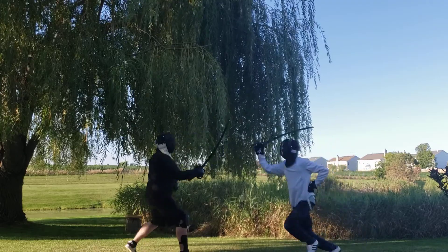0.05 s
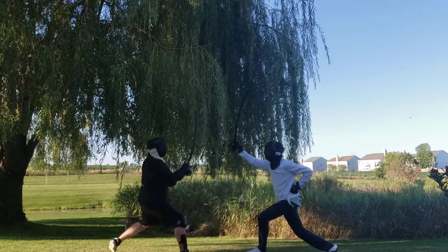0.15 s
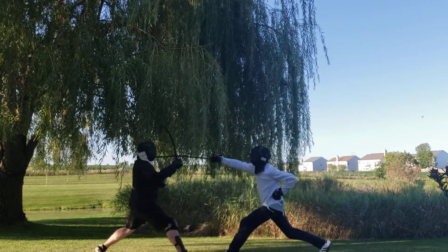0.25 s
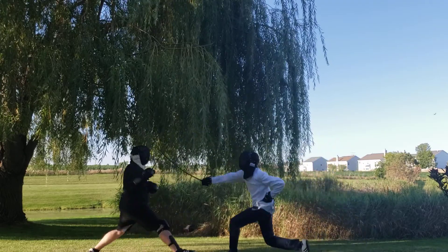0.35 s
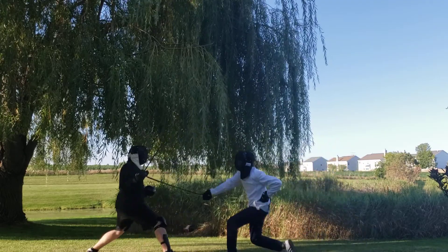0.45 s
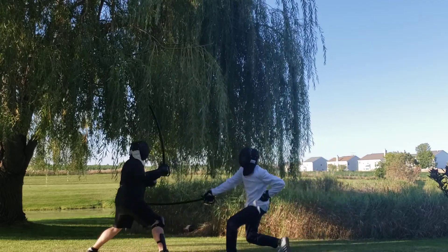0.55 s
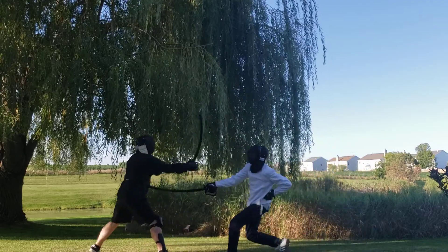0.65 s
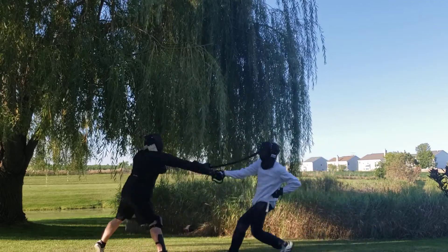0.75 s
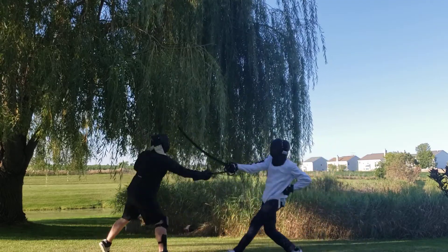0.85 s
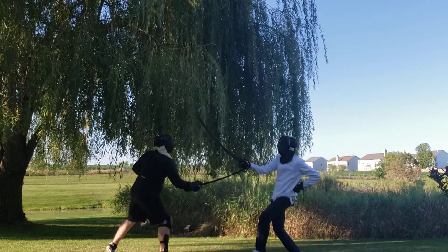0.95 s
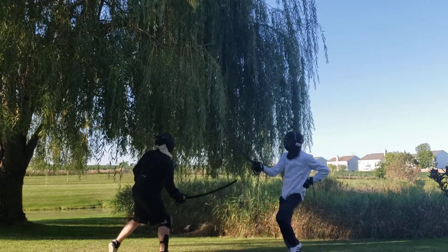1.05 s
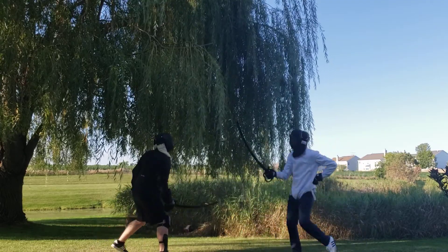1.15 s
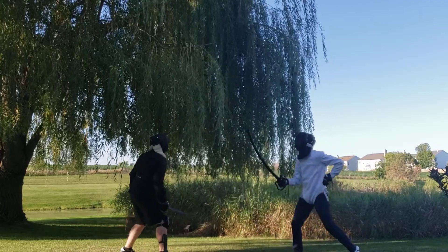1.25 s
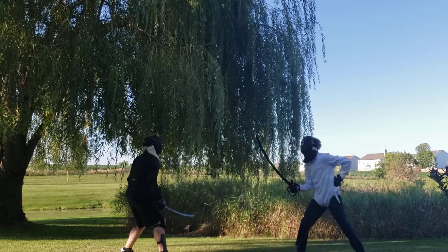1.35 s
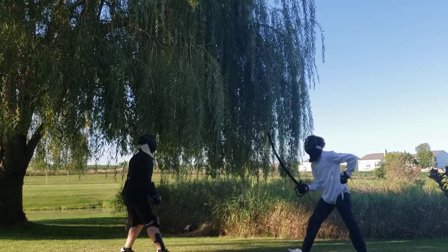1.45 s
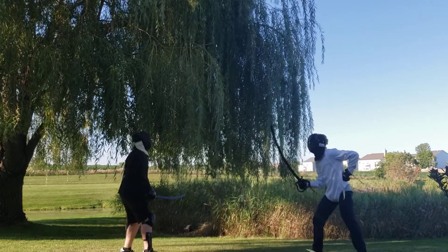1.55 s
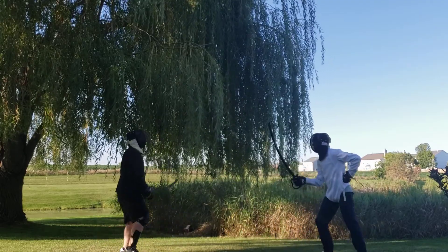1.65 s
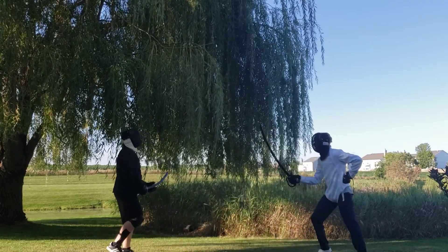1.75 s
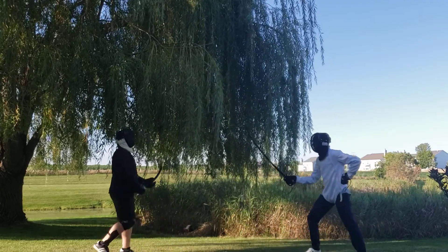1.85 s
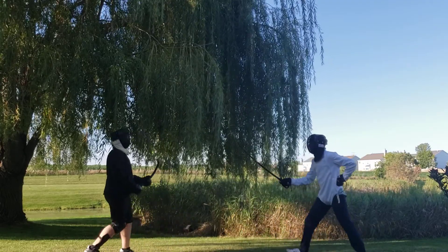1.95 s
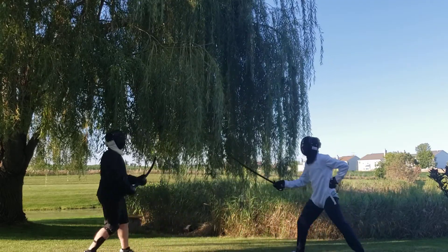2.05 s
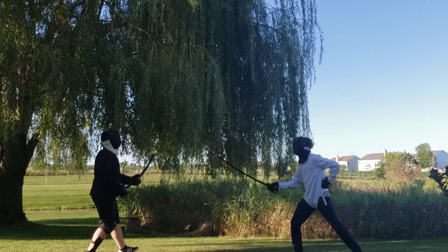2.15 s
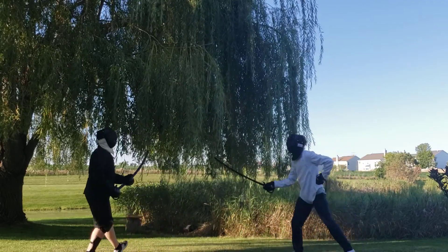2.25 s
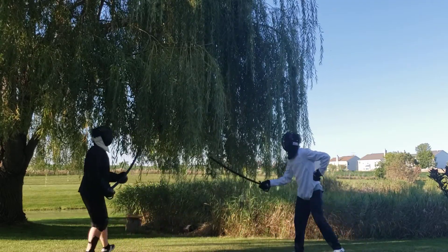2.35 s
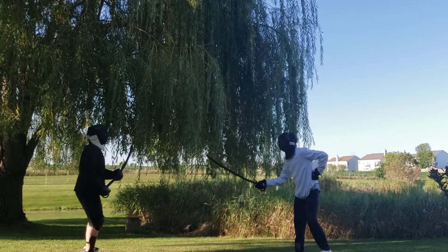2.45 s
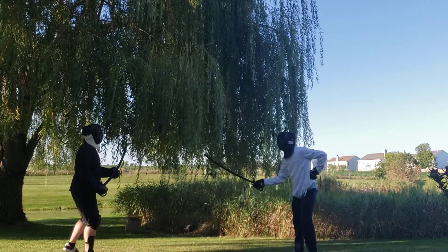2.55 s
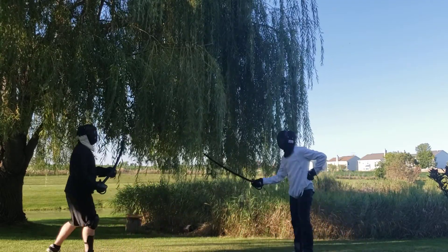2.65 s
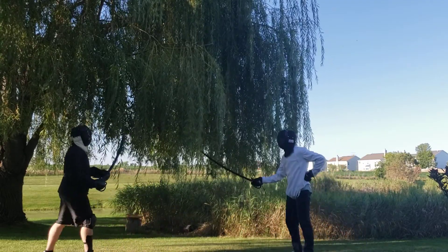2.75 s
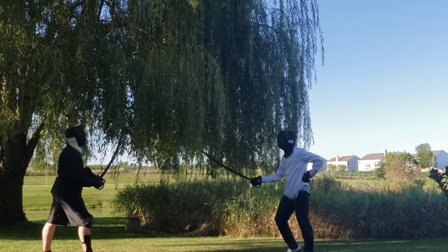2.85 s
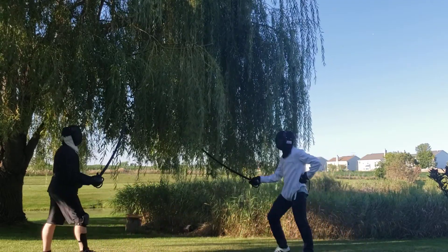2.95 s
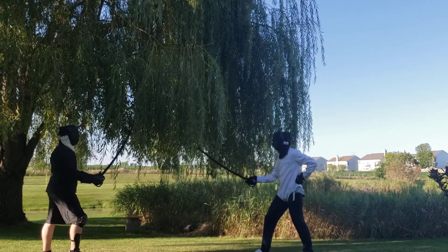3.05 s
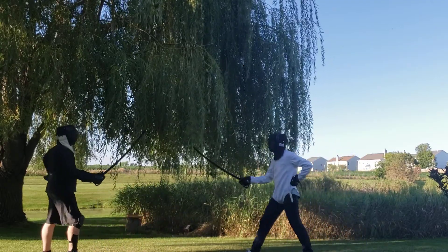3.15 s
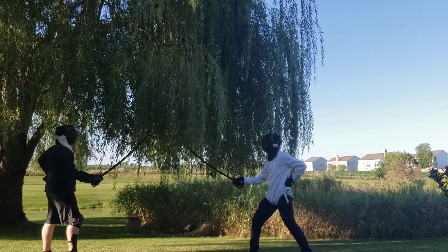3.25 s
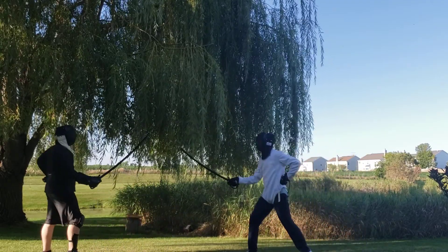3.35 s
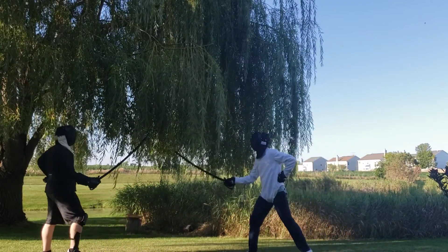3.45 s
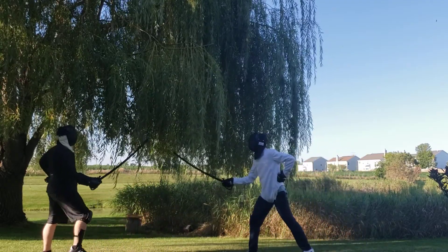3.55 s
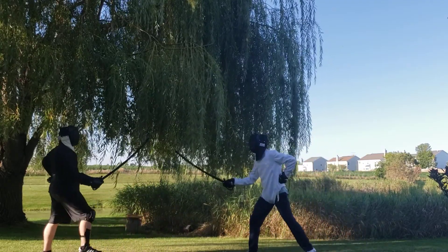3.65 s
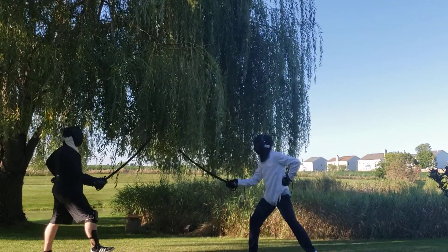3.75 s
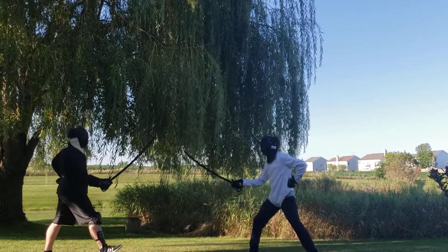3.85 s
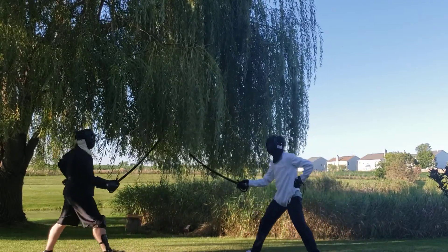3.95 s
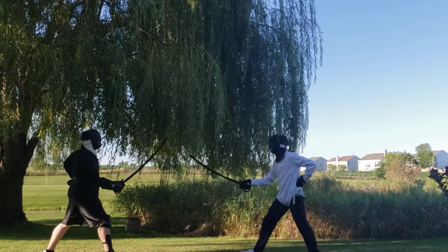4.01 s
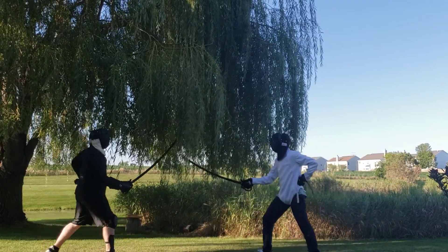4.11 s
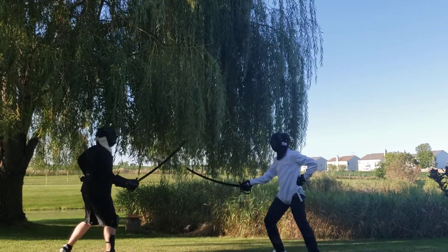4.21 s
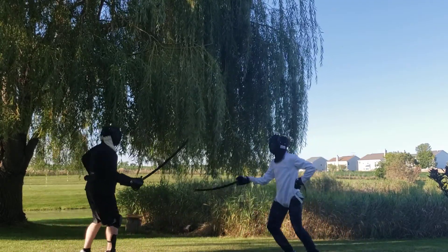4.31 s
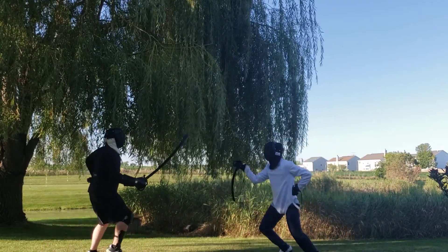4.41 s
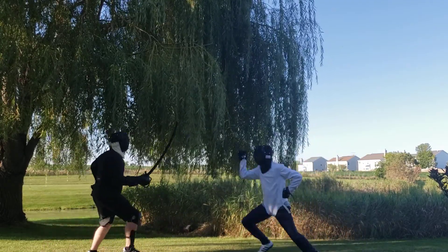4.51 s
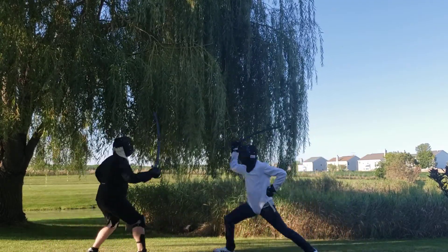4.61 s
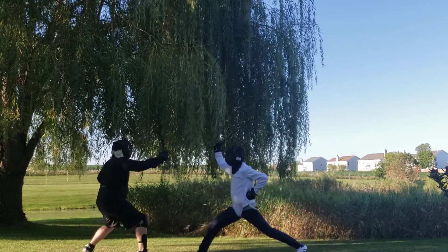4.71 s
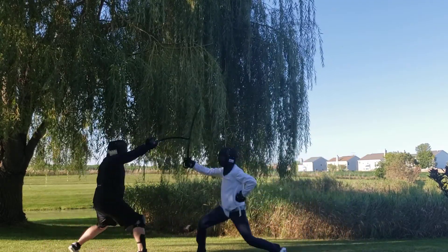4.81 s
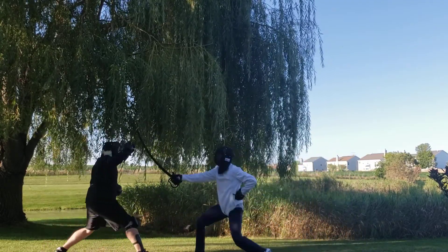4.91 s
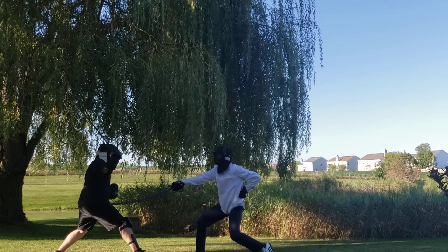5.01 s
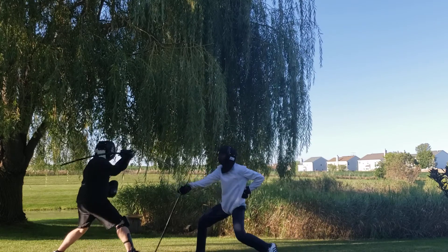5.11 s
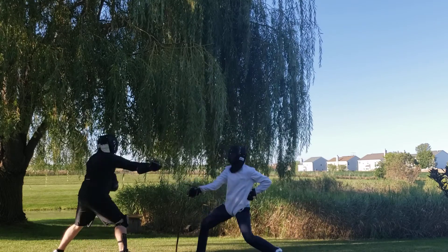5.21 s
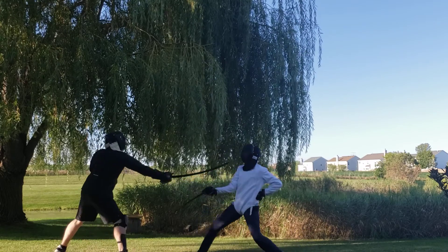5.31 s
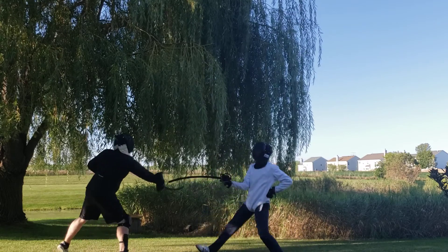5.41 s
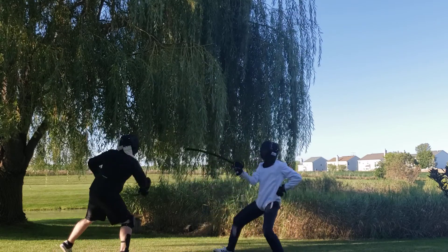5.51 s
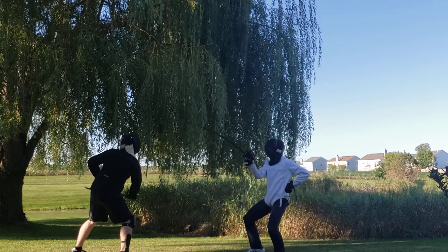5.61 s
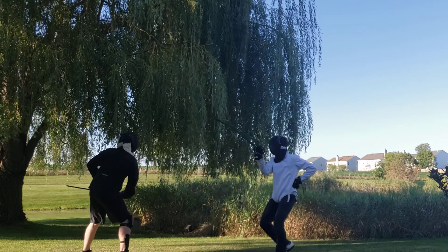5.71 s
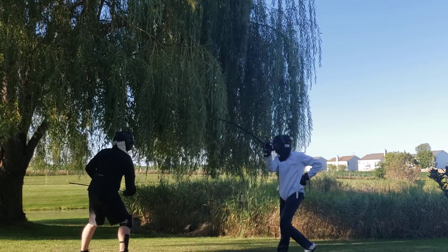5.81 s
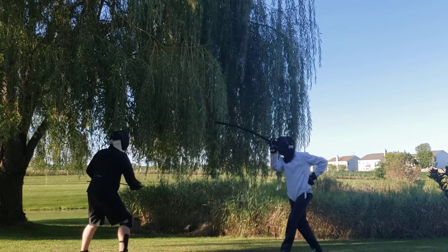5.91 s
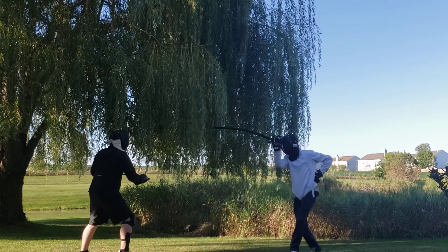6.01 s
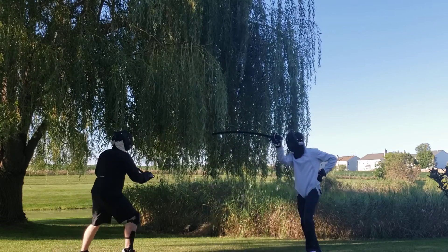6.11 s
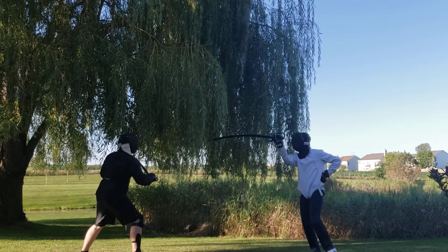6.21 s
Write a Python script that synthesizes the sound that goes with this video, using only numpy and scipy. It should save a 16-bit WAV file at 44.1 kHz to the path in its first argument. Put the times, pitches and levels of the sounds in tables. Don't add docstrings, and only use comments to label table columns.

```python
import sys
import numpy as np
from scipy import signal
from scipy.fft import rfft, irfft
from scipy.io import wavfile
from scipy.ndimage import uniform_filter1d

SR = 44100
rng = np.random.default_rng(int(sys.argv[2]) if len(sys.argv) > 2 else 0)


def master(y):
    cut = np.clip(np.atleast_2d(y).T, -1, 1)
    pcm = np.round(cut * 32767)
    wavfile.write(sys.argv[1], SR, pcm.astype(np.int16))


def elevation(decibels):
    levels = np.asarray(decibels, float)
    return 10 ** (levels / 20)


N = 276371
TIME = np.arange(N) / SR


def level(x, db):
    return x * elevation(db) / np.sqrt(np.mean(x ** 2))


def curve(table):
    return np.interp(TIME, *np.transpose(table))


def tilt(left_db):
    return elevation(np.array([[left_db], [-left_db]]))


def colour(points, channels=1):
    hz, db = np.transpose(points)
    axis_hz = np.log(np.fft.rfftfreq(N, 1 / SR) + 1)
    gain = elevation(np.interp(axis_hz, np.log(hz), db, left=-120, right=-120))
    return level(irfft(rfft(rng.standard_normal((channels, N))) * gain, N), 0)


def hump(hz, width_hz):
    return [(max(hz - 2 * width_hz, hz / 4), -25), (hz - width_hz / 2, -4), (hz, 0),
            (hz + width_hz / 2, -4), (hz + 2 * width_hz, -25)]


def walk(rate_hz):
    k = int(SR / rate_hz)
    held = np.repeat(rng.standard_normal(N // k + 1), k)
    return 1.3 * uniform_filter1d(uniform_filter1d(held, k), k)[:N]


def add(out, s, sound, pan_db, lag_s):
    for side, start_s in enumerate((s, s + lag_s)):
        i = int(start_s * SR)
        out[side, i:i + len(sound)] += sound[:N - i] * elevation(pan_db / 2 * (1 - 2 * side))


def swells(peak_s, peak_db, rise_db_per_s, fall_db_per_s):
    late_s = TIME - np.asarray(peak_s)[:, None]
    rise, fall = np.reshape(rise_db_per_s, (-1, 1)), np.reshape(fall_db_per_s, (-1, 1))
    slope = np.where(late_s < 0, rise, -fall)
    return elevation(np.maximum(np.asarray(peak_db)[:, None] + slope * late_s, -150)) ** 2


def rings(t, modes_hz, t60_s, chance, spread_db, shape_db):
    count = len(modes_hz)
    hz = np.array(modes_hz)[:, None] * (1 + 0.01209 * chance[:count, None])
    mode_gain = elevation(shape_db + spread_db * chance[::-1][:count])
    ring = mode_gain @ np.sin(2 * np.pi * hz * t)
    ring = ring * elevation(-60 * t / t60_s) * np.minimum(t / .0005, 1) ** 2
    return ring / np.abs(ring).max()


BLADE_HZ = [2330, 3000, 3780, 4170, 4900, 5970, 6170, 7780]
FORTE_HZ = [2000, 2623, 3200, 3520, 4500, 5250]
GUARD_HZ = [575, 842, 1164, 1461, 1790]
GUARD_DB = np.array([-5.5, 1, -0.5, -1, -7.5])


def clacks(table, lag_s, blade_t60_s, guard_t60_s, ring_db, narrow_db):
    out, t = np.zeros((2, N)), np.arange(SR // 10) / SR
    chance = rng.standard_normal((len(table), 16))
    high = signal.butter(4, 10000, "high", fs=SR, output="sos")
    for (s, db, hz, guard_db, crack_db, pan_db), luck in zip(table, chance):
        late_s = t - max(.0006, 1.4 / hz)
        modes_hz = np.array([hz, *BLADE_HZ, *FORTE_HZ])
        shape_db = -narrow_db * np.log2(modes_hz / hz) ** 2
        blade = rings(t, modes_hz, blade_t60_s, luck, 3.3, shape_db)
        burst = -np.cos(2 * np.pi * hz * late_s) * np.exp(-(late_s / max(.0003, .7 / hz)) ** 2)
        guard = rings(t, GUARD_HZ, guard_t60_s, luck[::-1], 1.5, GUARD_DB) * elevation(guard_db)
        splinters = rng.standard_normal(len(t)) * elevation(-60 * np.abs(late_s) / 0.0016)
        crack = signal.sosfilt(high, splinters) * elevation(crack_db + 5)
        blow = elevation(ring_db) * blade + elevation(2) * burst + guard + crack
        add(out, s - max(.0004, 1.4 / hz - .0002), elevation(db) * blow, pan_db, lag_s)
    return out


# (time [s], peak [dB], ring [Hz], guard knock [dB], crack [dB])
CLACKS = [(0.314, -13, 7630, -7, -5.5), (0.3142, -15, 4850, -20.5, -19), (0.3157, -18, 2410, -12.5, -14.5),
          (0.322, -22, 6200, -51.5, -15), (0.4588, -15, 2610, -25.5, -14), (.4588, -26, 1400, -13.5, -20),
          (.3452, -24.5, 4600, -30, -25), (.349, -24, 4300, -31.5, -25.5), (0.352, -27, 4980, -14, -26),
          (0.374, -31, 5000, -28, -24.5), (0.7723, -25.5, 2440, -1, -8), (0.773, -20, 3200, -4, -12),
          (0.7747, -20.5, 1497, -5, -19), (.776, -33.5, 907, -10.5, -21), (.7865, -26, 792, 7.5, -18),
          (.7935, -31.5, 9500, -20.5, -0.5), (0.798, -32, 4500, -14.5, -19.5),
          (.8105, -34.5, 2500, -4, -22), (0.7858, -26, 2950, -6.5, -9.5), (0.791, -35, 2350, -7, 1),
          (0.8025, -22.5, 1246, -12, -27.5), (.8024, -27, 3000, -20.5, -24.5),
          (4.7098, -46.5, 1037, -12, -12), (4.8864, -7, 5870, -28.5, -25), (4.8868, -19.5, 1305, -18, -16),
          (4.8866, -13, 3960, -29.5, -24.5), (4.892, -26.5, 5730, -24, -19.5),
          (4.8977, -19, 1412, -16, -7.5), (4.908, -28.5, 4000, -32, -24), (4.9147, -19, 4170, -39, -25),
          (4.9243, -25, 4100, -18, -18), (4.98, -34, 7780, -31, -24.5), (4.9454, -20.5, 4350, -37.5, -20.5),
          (4.952, -19.5, 4050, -8, -34), (5.455, -18.5, 3690, -11.5, -6), (5.4552, -21, 1377, -7, -16.5),
          (5.4554, -20, 14480, -31, -20.5), (5.4554, -31.5, 7600, -23, -15), (5.46, -32, 2330, -19, -14),
          (5.4755, -38, 990, -9, -22)]
# (time [s], peak [dB], ring [Hz], guard knock
# [dB], crack [dB])
MORE_CLACKS = [(0.3159, -15.5, 1463, -17.5, -30.5), (0.316, -18, 4900, -29, -25), (0.3654, -31, 2100, -25, -20),
               (.4585, -31.5, 6550, -29, -15), (.7725, -34, 4200, -25, -20), (.7728, -28, 6800, -28, -20.5),
               (.7735, -22.5, 2180, -20, -20.5), (0.7902, -26, 3250, -25, -19), (0.795, -32.5, 3800, -26, -21),
               (4.8866, -24.5, 2980, -29.5, -29.5), (4.8915, -25.5, 5600, -30, -25),
               (4.9125, -28, 5500, -31, -25), (4.919, -30, 5500, -30.5, -25.5), (4.927, -31.5, 5600, -30, -25),
               (4.9372, -28, 2480, -18.5, -31), (4.9525, -26.5, 2800, -9, -32), (5.4553, -31, 2140, -15, -20),
               (5.4556, -36, 5190, -25, -17), (5.4585, -38, 3000, -20, -15), (5.484, -47, 3840, -19, -15)]
# (time [s], left minus right [dB])
BLADES_PAN = [(.3, 6.5), (.5, 7), (.77, 4.5), (.81, 2.5), (4.9, 4), (4.92, 11.5), (4.96, 3.5), (5.46, 6)]


def struck_blades():
    struck = [(*row, np.interp(row[0], *np.transpose(BLADES_PAN))) for row in CLACKS + MORE_CLACKS]
    return clacks(struck, lag_s=.00005, blade_t60_s=.02, guard_t60_s=.02, ring_db=-9, narrow_db=6.5)


# (time [s], level [dB], centre [Hz], low part [dB], top part [dB])
SLIDES = [(.12, -70.5, 2700, -72.5, -85.5), (.26, -68.5, 2900, -67, -91.5), (.322, -41.5, 4840, -39.5, -40),
          (0.346, -30.5, 4260, -41, -40.5), (.375, -36.5, 4500, -51, -50.5), (.42, -51.5, 3600, -52.5, -59),
          (0.459, -35, 2740, -40.5, -48), (.52, -44, 3620, -74, -58), (.6, -55, 3250, -57, -68),
          (.779, -34.5, 2660, -39, -42.5), (0.788, -39, 3000, -31.5, -38), (.835, -41, 3200, -46.5, -50),
          (0.926, -47, 2260, -61, -63), (1.0, -60, 2400, -59, -73), (4.71, -71.5, 2640, -66.5, -75),
          (4.76, -67, 2970, -62, -61), (4.888, -41, 5500, -42.5, -33), (4.904, -30.5, 4500, -41, -51),
          (4.931, -42, 4700, -47.5, -50), (4.96, -35, 3600, -45, -48), (5.027, -43.5, 2870, -71, -66),
          (5.17, -60, 3300, -65, -90), (5.427, -57, 2640, -60, -71.5), (5.458, -57, 2900, -49, -48),
          (5.485, -48.5, 3470, -50, -50.5), (5.56, -65, 3000, -62, -64.5), (5.93, -74, 3400, -68, -78)]
BLOWS_S = np.array([0, .3143, .4588, .7729, 4.8865, 5.4552])


def slides():
    s, db, centre_hz, low_db, top_db = np.transpose(SLIDES)
    rise_db_per_s = np.where(db < -59, 176.5, 348.5)
    begun = TIME > np.take(BLOWS_S, np.searchsorted(BLOWS_S, s) - 1)[:, None]
    parts = []
    for part_db, fade, scatter_db, scatter_fade in ((db, 330, -17, 80), (low_db, 600, -27, 70),
                                                    (top_db, 380, -19, 90)):
        direct = swells(s, part_db, rise_db_per_s, fade)
        scatter = swells(s, part_db + scatter_db, rise_db_per_s, scatter_fade)
        parts.append((direct + scatter) * begun + 1e-16)
    hz = centre_hz @ parts[0] / parts[0].sum(axis=0)
    gain, low_gain, top_gain = (np.sqrt(part.sum(axis=0)) for part in parts)
    body = 0
    for band_hz in (2000, 2800, 3800, 4900, 6200, 7600):
        band_db = -11 * np.log2(band_hz / hz) ** 2 + 2 * walk(400)
        body = body + elevation(band_db) * colour(hump(band_hz, .3 * band_hz), channels=2)
    for line_hz in BLADE_HZ:
        line_db = -12.5 - 11 * np.log2(line_hz / hz) ** 2 + 1.1 * walk(33)
        body = body + elevation(line_db) * colour(hump(line_hz, 90), channels=2)
    knock = [(450, -21), (600, -5.5), (810, -5), (1000, -5), (1500, -6.5), (1900, -13.5)]
    hiss = [(6200, -5), (8200, -0.5), (9500, -0.5), (14000, -6), (16000, -7)]
    low = low_gain * elevation(-1.5 + 2 * walk(200)) * (colour(knock) + .6 * colour(knock, channels=2))
    top = top_gain * elevation(1 + 2 * walk(300)) * colour(hiss, channels=2)
    return tilt(1.5) * (gain * elevation(-4.5) * body + low + top)


# (time [s], near peak [dB], near ring [Hz], far peak [dB], far ring [Hz])
ECHOES = [
    (0.315, -30.5, 4813, -36.5, 4050),
    (0.4584, -30, 4600, -40, 2200),
    (0.7763, -34, 3600, -35, 2430),
    (4.8865, -9, 5500, -30, 4730),
    (4.9511, -28, 4130, -37.5, 3740),
]
# (time [s], peak [dB], ring [Hz], guard knock [dB],
# left minus right [dB])
STRAYS = [(.3843, -35.5, 1700, -5, 2), (.3850, -36, 4170, -20, 2), (.4525, -38.5, 1660, -14.5, 1),
          (.478, -38.5, 2590, -10, 2), (.5083, -39, 7500, -25, 8), (.5086, -44, 5600, -23, 8.5),
          (.5089, -35, 2420, -24, 8.5), (.531, -41, 4340, -3, 0), (.5668, -40, 1830, -22, 3.5),
          (.598, -47.5, 1310, -13, 4), (.6249, -40, 1130, -9, 15.5), (0.662, -49.5, 2600, -1, 5),
          (.8074, -35, 1820, 1, -14), (.8268, -32, 4900, -18, 6), (.8272, -36.5, 6100, -22, 6),
          (.8278, -30, 1800, -13, 5), (.8283, -40, 2600, -20, 3.5), (.8428, -28, 2270, -6, 3),
          (.9115, -43, 1750, -14, 0), (.9120, -40, 3800, -20, 2), (1.9545, -76, 1861, 11, 16),
          (4.9365, -25, 6900, -30, 8), (4.9370, -23, 4400, -32, 7.5), (5.0007, -38, 5600, -25, 5),
          (5.0210, -40, 8150, -25, 1), (5.0214, -35.5, 2400, -20, -6), (5.0855, -40, 2300, -20, 1.5),
          (5.108, -47, 5760, -25, -2), (5.1155, -45, 1120, -14, 13), (5.1329, -46, 1150, -10, 10)]


def echoes():
    near_s, far_s = .0502, .1347
    near_pan_db, far_pan_db, crack_db = 7.5, -1, -24
    guard_db, guard_db_per_khz = -10, -6.5
    rows = []
    for s, near_db, near_hz, far_db, far_hz in ECHOES:
        near_guard_db = guard_db + guard_db_per_khz * (near_hz / 1000 - 4)
        rows.append((s + near_s, near_db, near_hz, near_guard_db, crack_db, near_pan_db))
        rows.append((s + far_s, far_db, far_hz, guard_db, crack_db, far_pan_db))
    for s, db, hz, knock_db, pan_db in STRAYS:
        rows.append((s, db, hz, knock_db, -20, pan_db))
    returned = clacks(rows, lag_s=.00048, blade_t60_s=.009, guard_t60_s=.012, ring_db=-8, narrow_db=11)
    return returned * elevation(1.5)


def glides(table, rough):
    out = np.zeros((2, N))
    for s, length_s, from_hz, to_hz, db in table:
        part = np.linspace(0, 1, int(length_s * SR))
        wobble = uniform_filter1d(rng.standard_normal(SR // 5), 40)[:len(part)]
        hz = from_hz + (to_hz - from_hz) * part + 2500 * rough * wobble
        note = elevation(db + 4.5) * np.sin(np.pi * part) * np.sin(2 * np.pi * np.cumsum(hz) / SR)
        for late_s, echo_db, pan_db in ((0, -2, 13), (.011, -13, 17), (.023, -12, -6.5)):
            add(out, s + late_s, note * elevation(echo_db), pan_db, 0)
    return out


# (time [s], length [s], from [Hz], to [Hz], level [dB])
SWISHES = [
    (.15, 0.068, 1490, 1610, -75),
    (.205, 0.092, 1680, 1590, -74),
    (.93, .12, 1700, 1100, -68),
    (1.1, .07, 1150, 1150, -75),
    (5.398, 0.045, 2100, 1850, -65),
    (5.4, .04, 2900, 3000, -68),
    (5.438, .018, 1800, 1800, -60),
]


def swishes():
    return glides(SWISHES, rough=.35)


# (time [s], peak [dB], frequency [Hz])
THUDS = [
    (0.2929, -18.5, 213),
    (4.7522, -29, 297.2),
    (4.754, -21, 139),
    (4.7731, -26, 113.5),
]


def thuds():
    out = np.zeros((2, N))
    for s, db, hz in THUDS:
        turn = np.arange(5 * SR // hz) * hz / SR
        swell = np.minimum(turn / 0.19, 1) ** 2 * np.exp(-(turn / 1.14) ** 2)
        add(out, s, elevation(db + 1.5) * swell * np.sin(2 * np.pi * 1.15 * turn ** .7), -1, 0)
    return signal.sosfilt(signal.butter(4, 700, fs=SR, output="sos"), out)


# (time of peak [s], level [dB], rise [s], fall [s])
STEPS = [(.1, -72.5, .4, .4), (.28, -63, 0.043, 0.2), (.97, -63.5, 0.29, 0.23), (1.3, -67.5, 0.074, 0.21),
         (1.64, -69, 0.12, .16), (2.37, -67.5, 0.1, 0.12), (2.62, -79.5, 0.16, .2), (3.1, -78, 0.24, 0.34),
         (4.36, -65.5, 0.17, .09), (4.62, -70.5, 0.12, .15), (4.79, -65.5, 0.26, 0.18),
         (5.56, -62.5, 0.16, 0.13), (5.716, -75, .1, .2), (5.894, -71.5, 0.074, 0.18)]
# (frequency [Hz], density [dB per Hz])
GRASS = [(6000, -25), (9500, -12.5), (12000, -12), (15000, -4), (16200, -6.5)]


def grass():
    range_db, lawn_db = 15, -87
    s, db, rise_s, fall_s = np.transpose(STEPS)
    power = swells(s, db, range_db / rise_s, range_db / fall_s).sum(axis=0) + elevation(lawn_db) ** 2
    return colour(GRASS, channels=2) * np.sqrt(power) * elevation(3.5 + 2 * walk(50))


# (time [s], peak [dB], frequency [Hz])
PUFFS = [
    (.0495, -23, 68.4),
    (.115, -27.5, 93),
    (.132, -23.5, 68.5),
    (.268, -31.5, 60.4),
    (.84, -34, 60),
    (1.016, -29.5, 82),
    (1.128, -31, 73),
    (1.272, -36, 80.3),
]


def buffets():
    out = np.zeros((2, N))
    for s, db, hz in PUFFS:
        turn = np.arange(-2 * SR / hz, 2 * SR / hz) * hz / SR
        swell = np.exp(-(turn / 0.57) ** 2) * np.hanning(len(turn))
        add(out, s - 2 / hz, elevation(db) * np.sin(2 * np.pi * (turn - 0.2 * turn ** 2)) * swell, -25, 0)
    return out * elevation(-6.5)


# (time [s], level [dB], left minus right [dB])
WIND = [(0, -48, -20), (.16, -35.5, -24), (.2, -48.5, -8), (.33, -36, -5), (.5, -47, -8), (.78, -39, -17),
        (0.919, -45, -12.5), (1.2, -43, -4.5), (1.45, -47, -2), (2.401, -47, -1), (3.3, -46, 3),
        (3.7, -42.5, -3.5), (3.91, -45.5, 0), (4.04, -36, -16), (4.14, -46, 5.5), (5.197, -46, 24),
        (5.95, -46.5, 0), (6.27, -47.5, 0.5)]
# (frequency [Hz], density [dB per Hz])
RUMBLE = [(20, -30), (32, -20), (45, 1), (65, 1.5), (100, -1), (135, -9), (200, -34)]


def port_wind():
    s, *columns = np.transpose(WIND)
    rumble_db, pan_db = (np.interp(TIME, s, column) for column in columns)
    rumble_db = rumble_db - 0.6 + 0.4 * walk(4.3)
    extra = np.sqrt(np.clip(elevation(-1.6 * pan_db) - 1, 0, 12) + 0.11)
    own_gain = [[.3], [1]] * np.array([np.ones(N), extra])
    rumble = colour(RUMBLE) + own_gain * colour(RUMBLE, channels=2) * elevation(1.2 * walk(19))
    return elevation(rumble_db) / np.sqrt(1 + extra ** 2 / 4) * rumble


# (time [s], level [dB])
TREES = [(0.0, -48.5), (0.84, -46), (1.06, -51), (1.69, -49), (1.83, -49), (3.11, -48), (3.35, -49),
         (4.0, -45), (4.15, -41.5), (4.31, -44.5), (4.5, -46), (5.22, -49.5), (5.9, -45.5), (6.27, -52.5)]
# (frequency [Hz], density [dB per Hz])
ROAR = [(100, -21.5), (150, -8), (200, -3), (260, -1), (330, -7.5), (430, -21.5), (560, -21), (800, -44),
        (1000, -45.5)]
# (time [s], left share [0-1])
ROAR_FROM_LEFT = [(0, 0.02), (1, 0.07), (3.2, 0.83), (3.6, 0.76), (4.4, 0.92), (4.9, 0.7), (5.5, 0.88),
                  (6.27, 1)]


def tree_roar():
    lag_samples = 19
    share = np.clip(curve(ROAR_FROM_LEFT), 0, 1)
    left, right = np.sqrt([share, 1 - share]) * colour(ROAR, channels=2)
    trees = np.array([left + np.roll(right, lag_samples), right + np.roll(left, lag_samples)])
    roar = (trees + elevation(-13.5) * colour(ROAR, channels=2)) * elevation(0.97 * walk(15))
    return elevation(curve(TREES) + 0.99) * roar


# (centre [Hz], width [Hz], level [dB])
CHORUS = [(5298, 730, -9), (5600, 980, -6), (6200, 1600, -9.5), (7020, 430, 0), (7715, 260, -3.5),
          (8244, 400, -11.5)]
# (time [s], level [dB])
CRICKET = [(0, -79), (1, -82), (1.8, -81), (2.2, -78), (2.9, -76), (3.5, -76), (4.2, -75), (4.7, -79),
           (5.3, -84), (6.27, -80)]


def insects():
    chorus = 0
    for hz, width_hz, db in CHORUS:
        throb = 1 + 0.16 * np.sin(2 * np.pi * np.cumsum(39 + 4.6 * walk(3)) / SR)
        chorus = chorus + elevation(db + 1.1 * walk(4.2)) * throb * colour(hump(hz, width_hz), channels=2)
    chorus = signal.sosfilt(signal.ellip(6, 1, 40, 4700, "high", fs=SR, output="sos"), chorus)
    stroke = (37.2 * TIME + .41) % 1
    swell = np.sin(np.pi * np.minimum(stroke / .5, 1)) ** 2
    tone = np.sin(2 * np.pi * np.cumsum(6430 - 500 * stroke) / SR) * swell
    cricket = level(tone, 0) * elevation(curve(CRICKET) - 1.5 + .8 * walk(10))
    return tilt(3) * (level(chorus, -67) + cricket)


# (time [s], length [s], from [Hz], to [Hz], level [dB])
BIRDS = [
    (1.76, 0.06, 4110, 4100, -80),
    (2.0, 0.064, 4830, 4820, -74),
    (2.75, 0.07, 3750, 3700, -86),
    (3.39, 0.076, 8770, 8800, -83),
    (3.85, 0.054, 8750, 8750, -78),
    (3.663, 0.029, 3450, 4500, -76),
    (4.196, 0.04, 2950, 4400, -76.5),
]
# (time [s], length [s], from [Hz], to [Hz], level [dB])
RASPS = [
    (2.4, .07, 3700, 3500, -86),
    (3.201, 0.075, 3100, 3600, -82),
    (3.21, .04, 2500, 2450, -84),
    (3.675, .04, 3600, 2900, -79),
    (4.219, 0.065, 3300, 3280, -74.5),
]


def birds():
    return glides(BIRDS, rough=0.29) + glides(RASPS, rough=0.77)


# (frequency [Hz], density [dB per Hz])
FIELDS = [(400, 4), (700, 2), (1000, -7), (1400, -8), (2200, -14), (4400, -19), (8500, -13), (9500, -19),
          (12000, -20.5), (15200, -14.5), (16200, -16.5)]


def fields():
    return tilt(1.5) * colour(FIELDS, channels=2) * elevation(-67.5 + 0.2 * walk(2))


def scene():
    blades = struck_blades() + slides() + echoes() + swishes()
    feet = thuds() + grass()
    air = buffets() + port_wind() + tree_roar()
    return blades + feet + air + insects() + birds() + fields()


def low_pass(x):
    return signal.sosfilt(signal.butter(12, 16450, fs=SR, output="sos"), x)


def record(dry):
    dry = dry * np.minimum((N / SR - TIME) / .015, 1)
    dip = signal.lfilter(*signal.iirnotch(9400, 4, fs=SR), dry)
    top = signal.ellip(8, .5, 70, 16000, fs=SR, output="sos")
    mix = signal.sosfilt(top, 0.52 * dry + 0.45 * dip)
    return low_pass(mix)


dry = scene()
out = record(dry)
master(out)
```